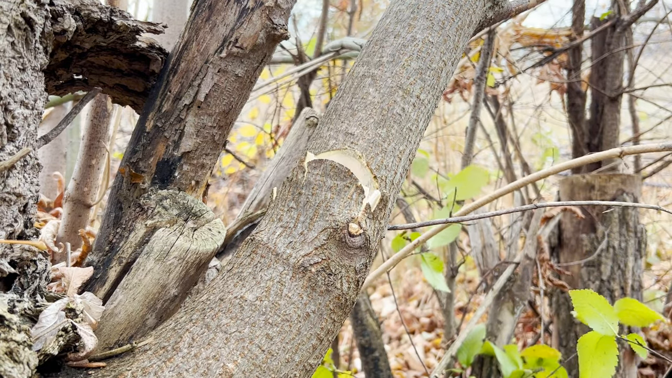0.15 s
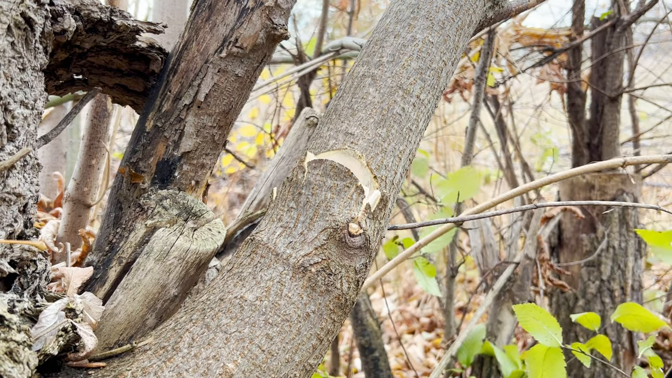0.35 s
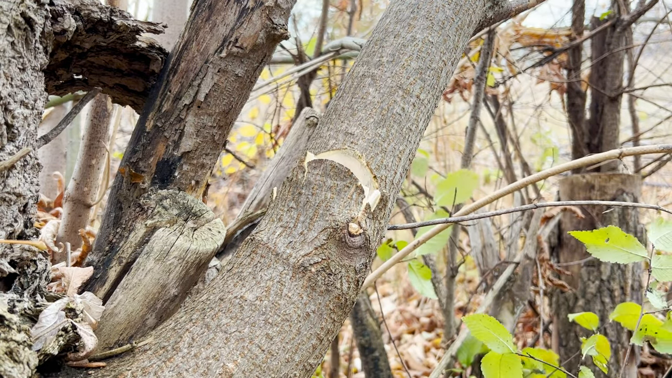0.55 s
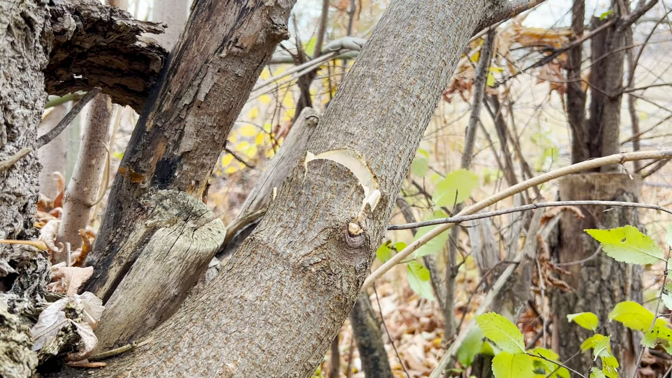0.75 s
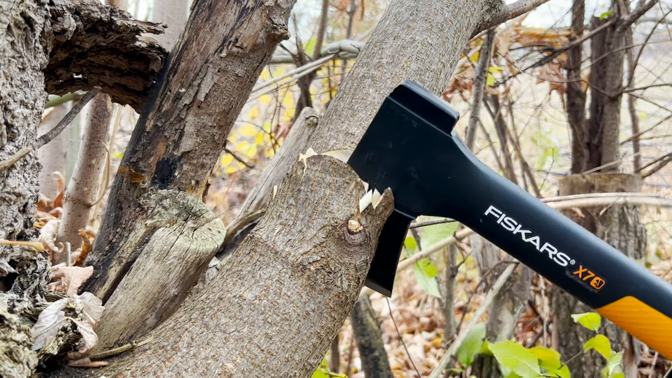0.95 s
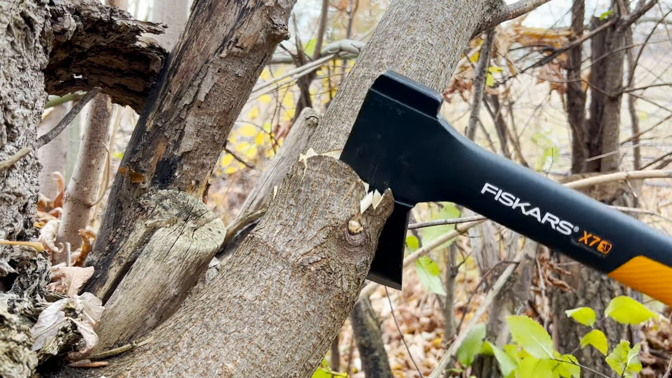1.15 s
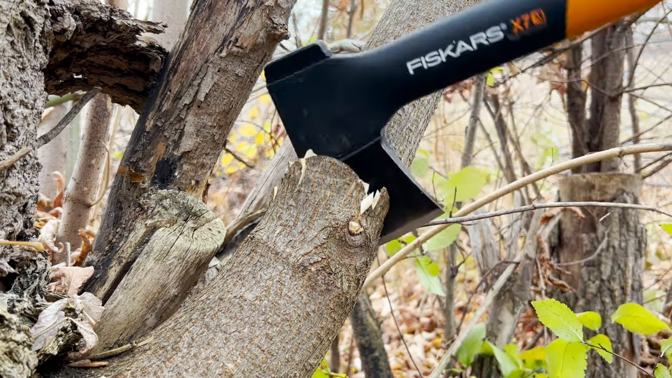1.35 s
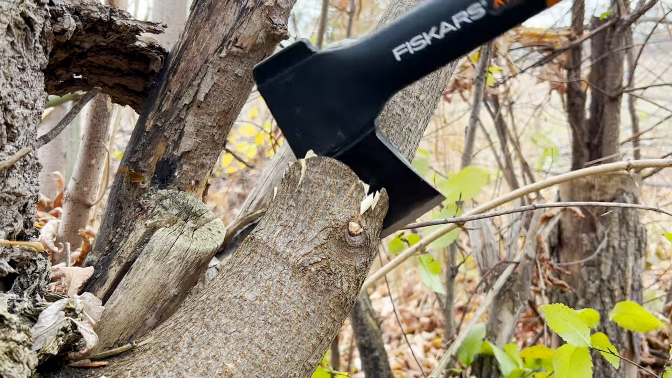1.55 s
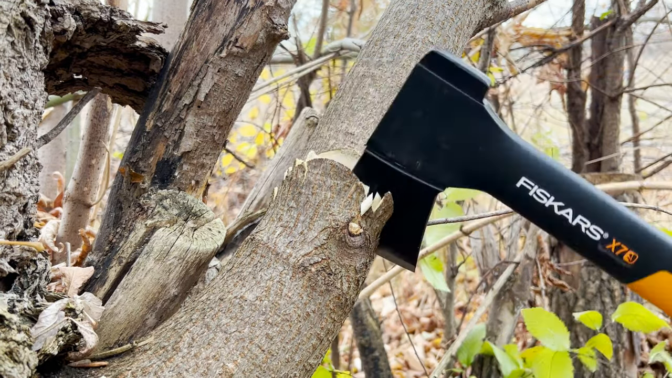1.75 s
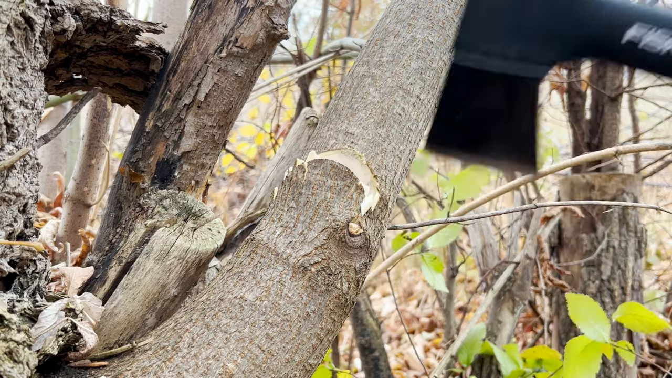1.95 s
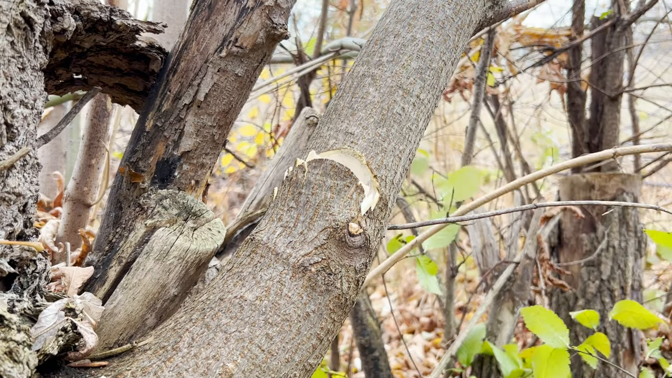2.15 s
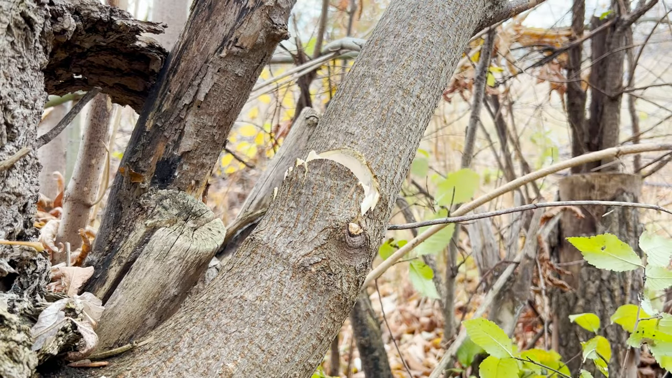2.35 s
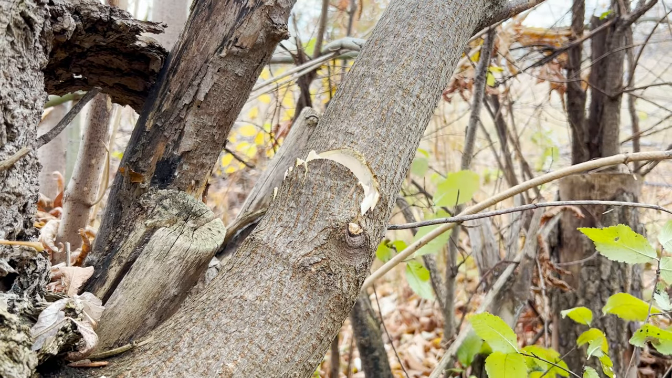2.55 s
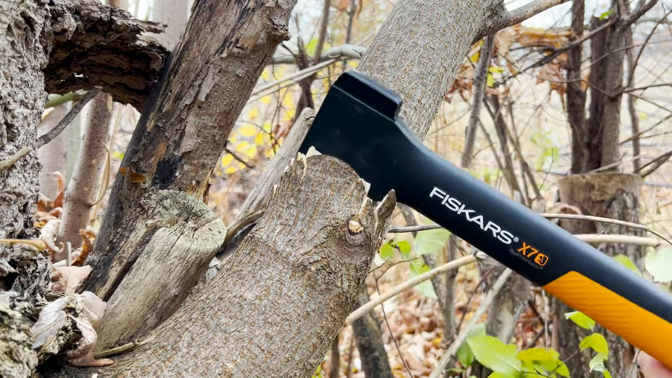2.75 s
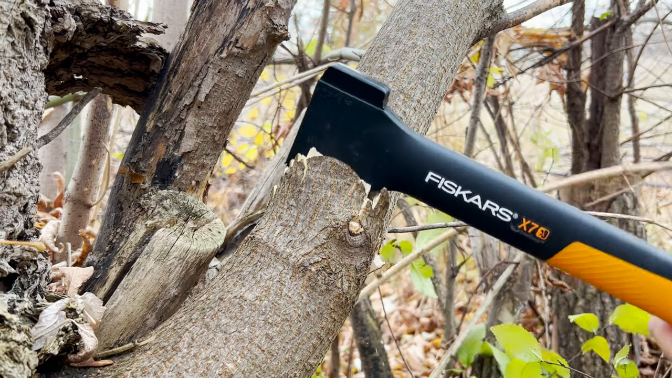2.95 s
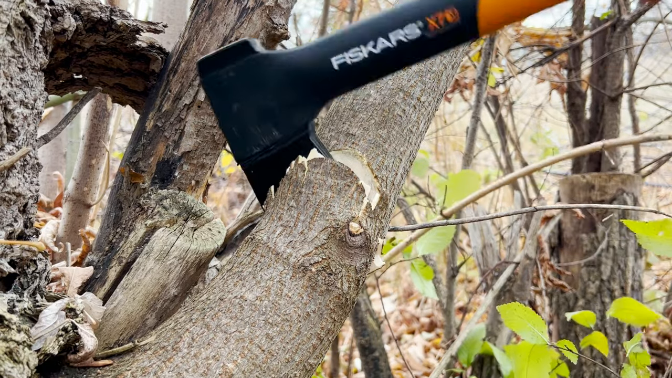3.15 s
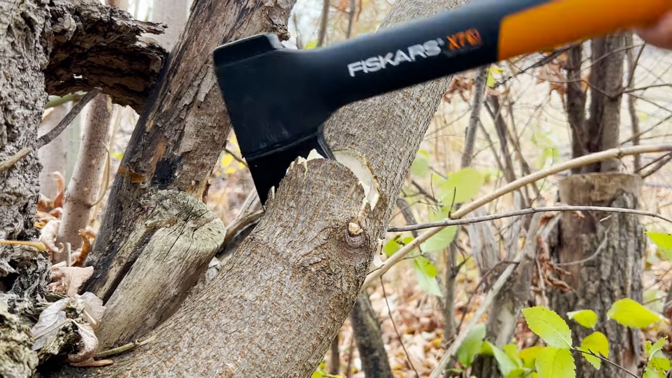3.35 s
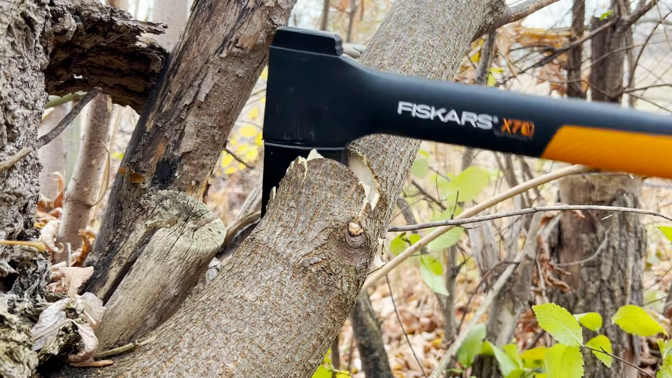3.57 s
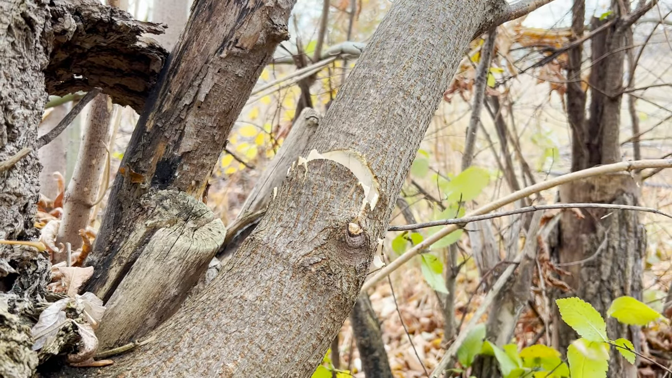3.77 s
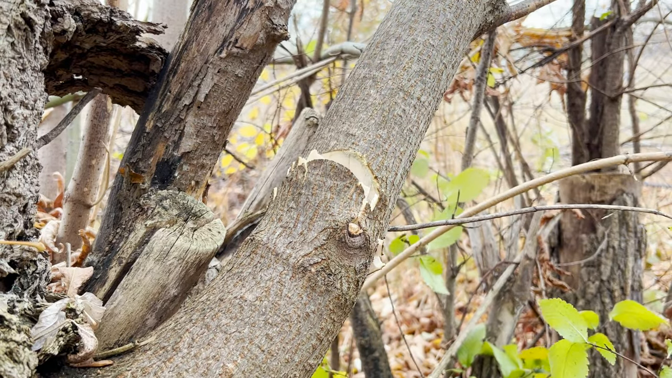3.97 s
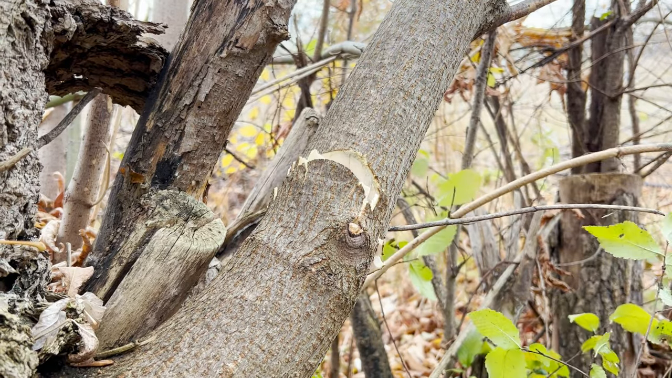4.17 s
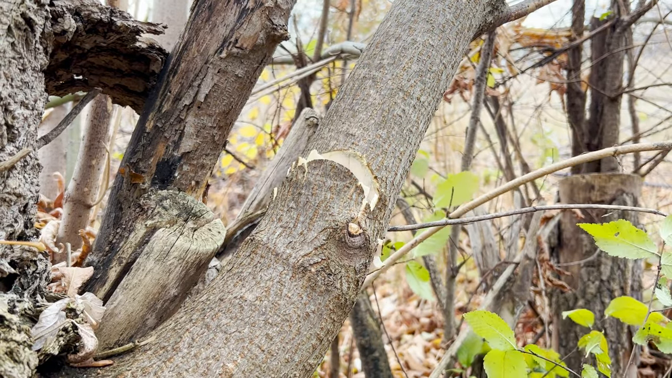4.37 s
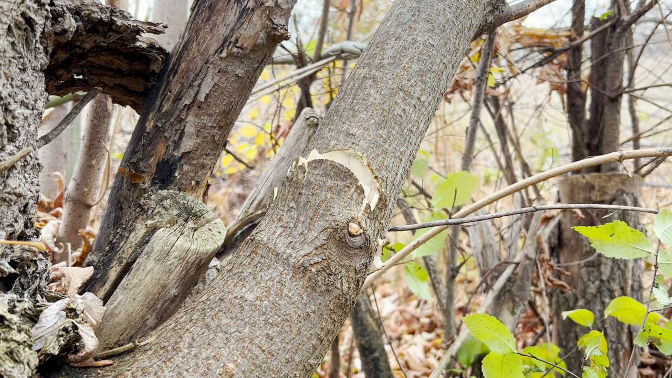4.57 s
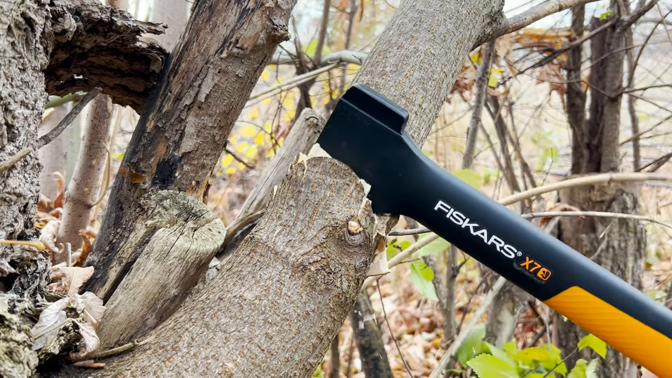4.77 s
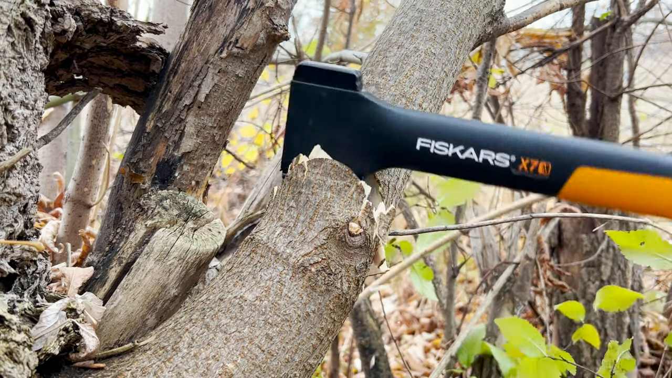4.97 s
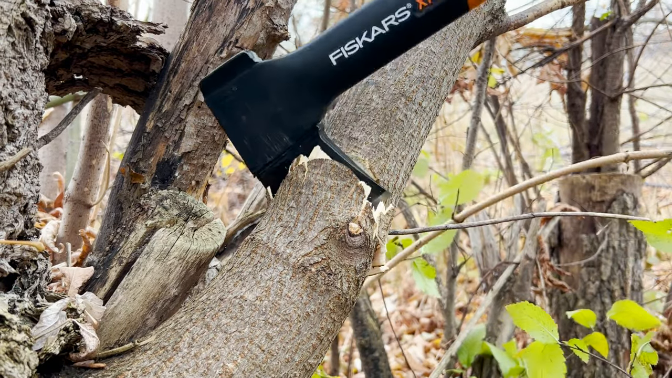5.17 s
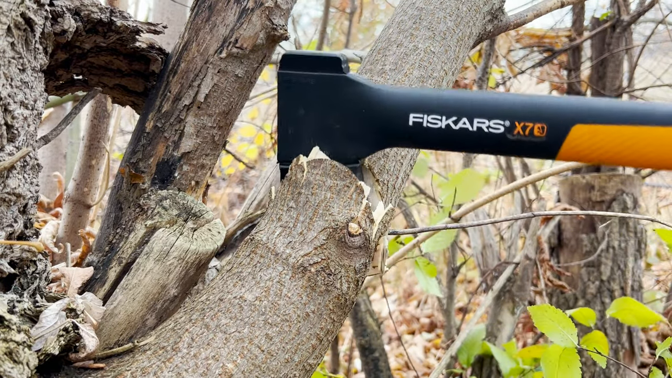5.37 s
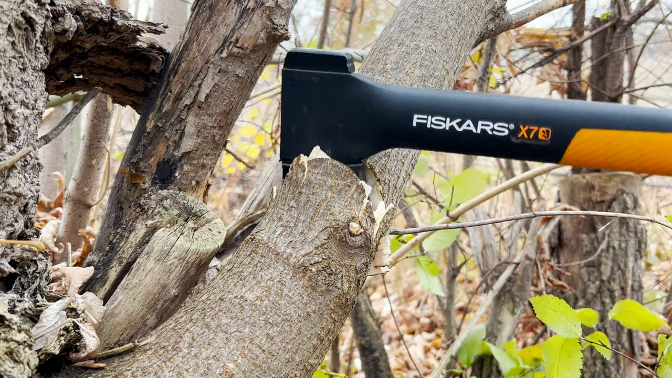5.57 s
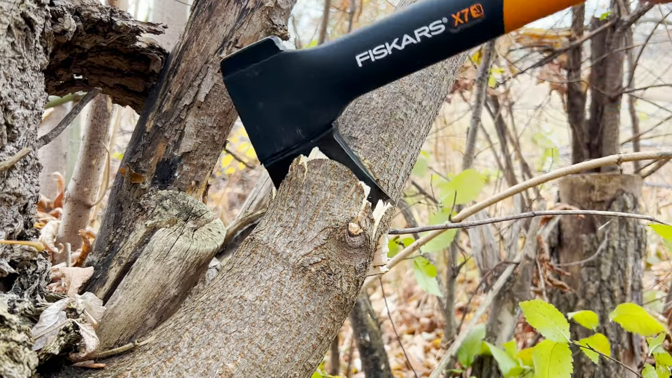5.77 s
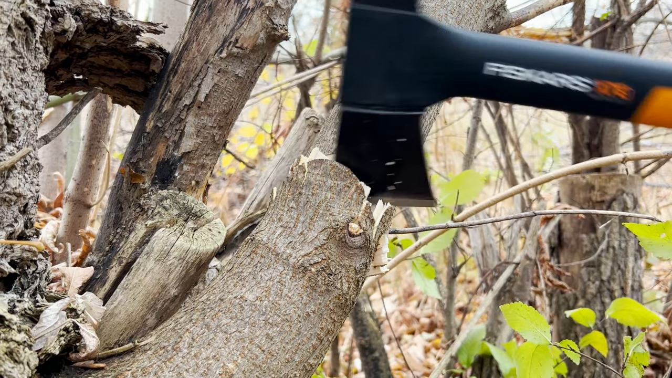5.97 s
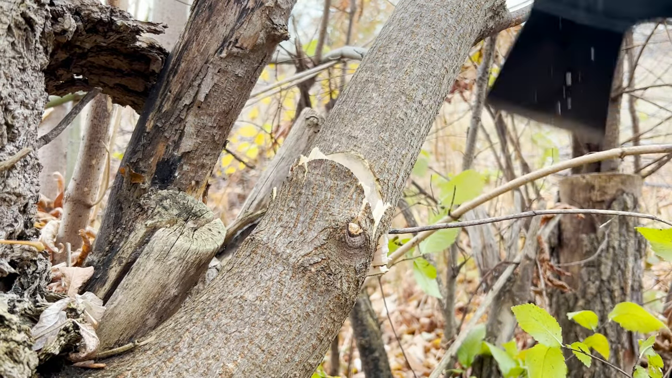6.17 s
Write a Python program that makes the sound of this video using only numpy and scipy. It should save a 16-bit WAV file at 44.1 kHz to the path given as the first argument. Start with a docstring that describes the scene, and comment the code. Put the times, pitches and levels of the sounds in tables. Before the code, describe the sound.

Close to the microphone, a hatchet bites into a small tree trunk three times, about two seconds apart. Each blow is a sharp crack with a brief metal ring and a hollow knock. The wood snaps as the blade is levered, and chips, twigs and dry leaves tick and rustle. Songbirds chirp, whistle and trill among echoing trees, while light gusts rumble on the microphone.

```python
"""Songbirds chip, whistle and trill among echoing trees while gusts buffet a two-port microphone.
Behind them are the hush of the wood, a far cricket and a slow, regular low thump.
Close by, a hatchet bites three times into a small trunk: the head rings, fibres split, the trunk booms.
The cut cracks as the blade is levered, and chips, twigs and dry leaves tick and rustle."""
import sys
import numpy as np
from scipy import signal
from scipy.fft import rfft, irfft, next_fast_len
from scipy.io import wavfile
from scipy.ndimage import uniform_filter1d, map_coordinates

SR = 44100
rng = np.random.default_rng(int(sys.argv[2]) if len(sys.argv) > 2 else 0)


def pcm_store(signal):
    """Save signal as 16-bit PCM."""
    levels = np.round(np.clip(np.atleast_2d(signal), -1, 1) * 32767)
    wavfile.write(sys.argv[1], SR, levels.astype(np.int16).T)


N = 274302

# Tone colours of noise: f/Hz, level/dB per Hz
AIR_RUMBLE = [(15, -35), (35, 14), (62, 13), (110, 6.5), (200, -30)]  # deep part of wind on the ports
AIR_FLAP = [(90, -10.5), (140, -2.5), (250, -13), (400, -27), (800, -38)]  # its sharper part
CRISP = [(300, -2.5), (2000, 6.5), (5000, 8), (8000, 14), (9300, 5.5), (10000, -10), (11000, 8.5),
         (13500, 12), (16000, -4)]  # bright part of leaf, twig and blade sounds
DULL = [(150, -0.5), (350, -1.5), (1500, -10), (3000, -14), (6000, -24.5)]  # their duller part
# Ringing tones of the hatchet head: f/Hz, level/dB, t60/s (the time to fade by 60 dB)
HEAD_TONES = [(1683, 4.5, 0.36), (2400, -9, .08), (2805, -7, 0.35), (4850, -10, 0.017)]


def amp(db):
    """Turns decibels into a gain."""
    return 10 ** (np.asarray(db) / 20)


def unit(x):
    """Scales a signal to an average (rms) level of 1."""
    return x / np.sqrt(np.mean(x ** 2) + 1e-20)


def along(points, hz):
    """Reads between (f/Hz, value) points on a log frequency axis."""
    freqs, values = np.transpose(points)
    return np.interp(np.log(hz + 1), np.log(freqs + 1), values)


def wobble(rate):
    """A smooth curve through `rate` random values a second."""
    return map_coordinates(rng.standard_normal(int(N * rate / SR) + 4), [np.arange(N) * rate / SR])


def filtered(x, response):
    """Changes the strength and phase of each frequency by response(hz)."""
    n = x.shape[-1]
    padded = next_fast_len(n + 8192)
    return irfft(rfft(x, padded) * response(np.fft.rfftfreq(padded, 1 / SR)), padded)[..., :n]


def noise(spectrum, size=N, alike=None):
    """Noise of a given tone colour; a left-right pair if `alike` is set (0 unrelated, 1 the same)."""
    def colour(hz):
        return amp(along(spectrum, hz)) * (hz < 1.5 * spectrum[-1][0])
    middle, side = (unit(filtered(rng.standard_normal(size), colour)) for _ in range(2))
    if alike is None:
        return middle
    turn = np.arccos(np.clip(alike, 0, 1)) / 2
    return np.cos(turn) * middle + np.sin(turn) * np.array([side, -side])


def patchy(x, depth_db):
    """Makes random patches of time and frequency louder or softer."""
    cells = signal.stft(x, nperseg=256)[2]
    patches = uniform_filter1d(rng.standard_normal(cells.shape[-2:]), size=4, axis=0)
    patches = uniform_filter1d(patches, size=6, axis=1)
    return unit(signal.istft(cells * amp(depth_db * unit(patches)), nperseg=256)[1][..., :N])


def add(track, s, sound):
    """Mixes a sound in at s seconds."""
    part = track[round(s * SR):][:len(sound)]
    part += sound[:len(part)]


def ring(tones, t, attack):
    """A struck thing rings with fading tones, each at a slightly random strength."""
    ringing = sum(amp(db + rng.normal(0, 2.2) - 60 * t / t60) * np.sin(2 * np.pi * hz * t)
                  for hz, db, t60 in tones)
    return ringing * (1 - np.exp(-t / attack))


def near(x, low_pan_db):
    """A close sound reaches both ports: bass favours the left, treble shifts in phase between them."""
    # How far the left port's wave is ahead: f/Hz, phase/rad
    left_lead = [(100, 0.1), (700, 1.26), (2000, 0.73), (7800, 1), (10000, -19.5), (13000, -4.5),
                 (16500, -9.5)]
    side = np.array([[.5], [-.5]])
    def ports(hz):
        balance = amp(side * low_pan_db / (1 + (hz / 800) ** 2))
        return balance * np.exp(1j * side * along(left_lead, hz))
    return filtered(np.array([x, x]), ports)


def trees(x):
    """Trunks scatter sound: the nearest answer quickly, then each frequency fades at its own speed."""
    # How long the wood echoes: f/Hz, t60/s
    echo_times = [(200, 1), (2000, 0.79), (5000, 0.58), (12000, 0.36)]
    hz, t, cells = signal.stft(rng.standard_normal((3, 2, SR)), SR, nperseg=256)
    fade = amp(-60 * t / along(echo_times, hz)[:, None]) + 2.8 * amp(-60 * t / 0.02)
    tails = signal.istft(cells * fade, SR, nperseg=256)[1]
    tails[:, 1] = 0.6 * tails[:, 0] + 0.56 * tails[:, 1]  # right partly follows left
    tails /= np.linalg.norm(tails[0, 0])
    # Three echo paths take turns, as sounds come from different places.
    turns = np.cos(np.pi * (np.arange(N) / SR / .45 + np.arange(3)[:, None] / 3)) * np.sqrt(2 / 3)
    delayed = np.pad(x * turns, ((0, 0), (150, 0)))[:, None]
    return signal.fftconvolve(delayed, tails, axes=2).sum(axis=0)[:, :N]


def hush():
    """The steady, far-off noise of the wood."""
    # Its tone colour: f/Hz, level/dB per Hz
    colour = [(15, -30.5), (25, -1.5), (65, 0), (207, -6), (329, -6.5), (631, -12), (723, -13.5),
              (948, -14), (1030, -14), (3990, -17.5), (4830, -19.5), (15100, -27), (16400, -31)]
    return amp(-53.5) * noise(colour, alike=0.073)


def thumps():
    """A slow, regular beat of very low pulses."""
    # One per beat: level/dB
    levels = [-31, -27, -27, -35, -27.5, -31, -26.5, -37.5, -34, -23, -31]
    first_s, every_s, fade_s = .14, .557, .061
    out, t = np.zeros(N), np.arange(SR // 5) / SR
    pulse = np.sin(2 * np.pi * 9 * t) * np.exp(-(t / fade_s) ** 2)
    for beat, db in enumerate(levels):
        add(out, first_s + beat * every_s, amp(db) * pulse)
    return out


def gusts():
    """Wind buffets the ports and sounds sharper as it grows."""
    # Strength of the wind: t/s, level/dB
    strength = [(0, -27.5), (.1, -61.5), (.45, -49), (.75, -41.5), (.95, -37.5), (1.16, -47), (1.33, -47),
                (1.5, -57), (1.8, -43.5), (2.16, -36.5), (2.35, -35.5), (2.43, -48.5), (2.9, -44.5),
                (4.3, -59), (4.6, -50), (4.77, -35.5), (4.96, -53), (6.22, -61)]
    db = np.interp(np.arange(N) / SR, *np.transpose(strength))
    lumps = amp(4.6 * wobble(25))
    rumble = amp(db) * noise(AIR_RUMBLE, alike=0.71)
    return rumble + amp(1.237 * db - 3.5) * unit(lumps * noise(AIR_FLAP, alike=0.543))


def slaps():
    """Single puffs of air hit the ports: a low swing with a sharper flick."""
    # Puffs: t/s, level/dB, flick against swing/dB
    puffs = [(0.614, -32.5, -2.5), (0.709, -37, -20), (1.102, -34, -31.5), (1.801, -32.5, -16),
             (1.834, -27.5, -14), (1.888, -25.5, -25), (2.005, -30, -7.5), (2.038, -37.5, 3),
             (2.186, -24, -14.5), (2.269, -34.5, -1), (2.682, -25, -16), (3.679, -47, 5.5),
             (3.982, -40.5, -25)]
    out, t = np.zeros(N), np.arange(SR // 5) / SR
    for s, db, flick_db in puffs:
        swing = np.sin(2 * np.pi * rng.uniform(46.2, 80.5) * t) + 0.69 * noise(AIR_RUMBLE, len(t))
        flick = amp(flick_db) * np.exp(-t / 0.077) * noise(AIR_FLAP, len(t))
        add(out, s, amp(db) * t / 0.0044 * np.exp(-t / 0.012) * (swing + flick))
    return out


def cricket():
    """A thin, high sound swells about three times a second, each swell a run of wing strokes."""
    t = np.arange(N) / SR
    chirp = np.clip(np.cos(2 * np.pi * 2.984 * (t - 3.27) + .5 * wobble(2.94)) + 1.78, 0, 2)
    strokes = 1 + 0.15 * np.sin(2 * np.pi * 53 * t)
    wings = [(4300, -50), (4600, -8), (4750, 0), (4900, -8), (5200, -50)]  # f/Hz, level/dB per Hz
    return amp(-69.5) * chirp * strokes * noise(wings, alike=0.5)


def far_bird():
    """Thin, pure notes that scoop up to their pitch, flicker and fade."""
    # Notes: t/s, length/s, start f/Hz, held f/Hz, level/dB, change over the note/dB
    notes = [(2.15, .27, 3940, 4035, -49, -21), (2.82, .125, 3950, 4040, -58, -1)]
    scoop_s, edge_s = .02, .012
    out = np.zeros(N)
    for s, length, from_hz, hz, db, fade_db in notes:
        t = np.arange(0, length, 1 / SR)
        pitch = hz + (from_hz - hz) * np.exp(-t / scoop_s)
        edges = np.clip(np.minimum(t, length - t) / edge_s, 0, 1)
        add(out, s, amp(db + fade_db * t / length) * edges * np.sin(2 * np.pi * np.cumsum(pitch) / SR))
    return out * amp(2.5 * wobble(60))


def songbirds():
    """Wavering pure notes glide onto a pitch and off it; returns the direct part and the part to echo."""
    # Notes: t/s, length/s, start f/Hz, held f/Hz, end f/Hz, relative level/dB, glide-in/s
    chips = [(.054, 0.011, 5070, 4820, 4660, -38, 0.0047), (.165, 0.034, 4720, 3534, 3100, -34.5, 0.0031),
             (.27, 0.034, 4880, 3550, 2350, -40, .003), (.492, 0.041, 4710, 3480, 2790, -39, 0.00355),
             (.822, 0.074, 9410, 3480, 2770, -38.5, 0.011), (1.056, 0.05, 6400, 3694, 2470, -38, 0.0055),
             (5.03, 0.026, 4410, 3606, 3850, -46, 0.0043), (5.086, 0.033, 3820, 3386, 3450, -41.5, 0.004),
             (5.138, 0.028, 3780, 3310, 3340, -49, 0.0035), (5.198, 0.032, 3620, 3260, 3200, -48.5, 0.0053),
             (5.262, 0.018, 4200, 3180, 2580, -46, 0.0055), (5.335, 0.015, 4080, 3110, 2480, -45.5, 0.0055),
             (5.405, 0.012, 4380, 3166, 2620, -47.5, 0.0063), (5.476, 0.019, 3800, 3030, 2560, -49, 0.0083)]  # the nearer bird drops onto a pitch
    arches = [(.03, 0.036, 3490, 3850, 4400, -44, 0.0074), (.113, 0.051, 4460, 4766, 4900, -36, 0.014),
              (.258, 0.011, 4060, 5010, 4600, -39.5, 0.0061),
              (.487, 0.0081, 4190, 4520, 4400, -38.5, 0.003), (.99, 0.049, 3520, 4614, 4320, -41.5, 0.0058),
              (1.225, 0.06, 3270, 4690, 3030, -44.5, 0.012), (1.328, 0.059, 3807, 4630, 3170, -41, 0.011),
              (1.33, 0.046, 3486, 3923, 3500, -45.5, 0.009), (1.228, 0.0456, 3180, 3940, 3600, -47, 0.0127),
              (1.43, 0.069, 4040, 4770, 4200, -40, 0.0074), (1.425, 0.05, 3490, 3870, 3560, -46, 0.01212),
              (1.54, 0.048, 4560, 4640, 3870, -44, 0.0063), (1.645, 0.024, 4490, 4560, 4740, -45, 0.0072)]  # it climbs onto a pitch
    whistles = [(0, 0.15, 1887, 2184, 2178, -57, 0.042), (.26, 0.15, 2350, 1763, 1817, -54, 0.029),
                (.326, 0.099, 2724, 3237, 3156, -39.5, 0.013), (.6, 0.11, 2210, 2230, 2130, -61.5, 0.016),
                (.895, 0.27, 2046, 1990, 2624, -57, 0.023), (5.197, .235, 1580, 2331, 2014, -55.5, 0.009),
                (5.47, 0.096, 2240, 2200, 2136, -59.5, 0.031), (5.55, 0.084, 2190, 2620, 2540, -53, .035)]  # long notes of farther birds
    # Runs of falling sweeps: the same columns, then sweep rate/Hz, sweep size/Hz
    trills = [(1.625, 0.13, 3676, 3510, 3470, -43, 0.051, 52.25, 1080),
              (3.42, 0.17, 3680, 3520, 3400, -44.5, 0.059, 53.5, 1052),
              (5.3, 0.149, 3675, 3546, 3380, -47.5, 0.0498, 60.5, 1496)]
    buzzes = [(0, 0.034, 3306, 3530, 3690, -35, 0.021, 131, 810),
              (1.925, 0.11, 5300, 4670, 4470, -50.5, 0.011, 129.3, 700),
              (4.84, 0.2, 5400, 5440, 5400, -55.5, 0.055, 128.6, 504),
              (4.97, 0.095, 5960, 5573, 5508, -54.5, 0.024, 128, 914),
              (5.555, 0.2, 3987, 2526, 2564, -39.5, .08, 129.2, 620),
              (5.74, 0.12, 2700, 2490, 2460, -53.5, 0.035, 129, 297)]  # too quick or too far to count
    # notes, glide-out, swell, die-away (shares of a note), change/dB, flutter/dB, direct/dB, echo/dB
    kinds = [(chips, 0.11, 0.16, 0.1, 0.1, 1.5, -1.5, -1),
             (arches, 0.11, 0.3, 0.04, 1.5, 1.8, -1.5, -2.5),
             (whistles, 0.6, 0.12, 0.3, -1.5, 3, -4, -3),
             (trills, 0.54, 0.18, 0.15, 1.5, 1.6, -1, -2),
             (buzzes, 1.65, 0.12, 0.8, -9, 2, -2, 2.5)]
    direct, scattered = np.zeros((2, N))
    waver, flutter = wobble(120), wobble(90)
    for notes, glide_out, swell, die, change_db, flutter_db, direct_db, echo_db in kinds:
        for s, length, from_hz, hz, end_hz, db, glide_in_s, *trill in notes:
            rate, sweep_hz = trill or (0, 0)
            t = np.arange(0, length, 1 / SR)
            progress = t / length
            span = slice(round(s * SR), round(s * SR) + len(t))
            sweep = (rate * t + 0.068 * flutter[span]) % 1
            gate = np.sin(np.pi * np.clip(sweep / 0.74, 0, 1)) if rate else 1  # gaps between sweeps
            edges = np.clip(np.minimum(progress / swell, (1 - progress) / die), 0, 1)
            glide = (from_hz - hz) * np.exp(-t / glide_in_s)
            glide += (end_hz - hz) * np.exp((progress - 1) / glide_out)
            pitch = hz * (1 + 0.003 * flutter_db * waver[span]) + glide + sweep_hz * (.4 - sweep)
            loudness = amp(db + 6.0 + change_db * progress + flutter_db * flutter[span])
            voice = loudness * gate * edges * np.sin(2 * np.pi * np.cumsum(pitch) / SR)
            # Fainter birds are farther away, so less of their song arrives straight.
            add(direct, s, amp(direct_db + 0.096 * (db + 34.0)) * voice)
            add(scattered, s, amp(echo_db) * voice)
    return direct, scattered


def leaves():
    """Dry leaves, shaken by the blows and the arm, swell and fade over a faint steady rustle."""
    # Shakes: peak t/s, level/dB, dull against crisp/dB, rise/s, fall t60/s
    shakes = [(.9, -59.5, 10.5, 0.15, 3), (1.62, -60, 2.5, 0.055, 1.43), (2.405, -53, -3, 0.02, 0.3),
              (2.49, -49, -13, 0.019, 0.34), (2.523, -41, -9, .003, 0.24), (3, -56.5, 7.5, 0.097, 2.2),
              (3.45, -64.5, 6.5, 0.08, 4.5), (4.7, -51.5, 5, 0.052, 0.693), (4.88, -56.5, 4, 0.13, 0.7)]
    t = np.arange(N) / SR
    crisp_power, dull_power = amp(-75) ** 2, amp(-90) ** 2  # leaves at rest
    for s, db, dull_db, rise, t60 in shakes:
        shape = np.where(t < s, np.exp(-((t - s) / rise) ** 2), amp(-120 * np.abs(t - s) / t60))
        crisp_power += amp(db) ** 2 * shape
        dull_power += amp(db + dull_db) ** 2 * shape
    grain = amp(4.5 * wobble(400) + 2.5 * wobble(50))
    crisp = unit(grain * near(noise(CRISP), low_pan_db=3) + 1.2 * noise(CRISP, alike=0.089))
    dull = patchy(noise(DULL, alike=0.55), depth_db=4.0)
    return np.sqrt(crisp_power) * crisp + np.sqrt(dull_power) * dull


def twigs():
    """Chips and twigs tick, each with a snap, a knock and a woody ring."""
    # Ticks: t/s, snap level/dB, relative level of knock and ring/dB
    ticks = [(0.115, -47.5, -4.5), (0.571, -43, -13), (0.612, -47, -18), (0.887, -36, -31),
             (1.465, -41.5, -19.5), (1.619, -44, -11), (2.486, -36, -37), (2.5, -51.5, -2),
             (2.5177, -28.5, -33), (2.522, -29.5, -38), (2.542, -35.5, -17.5), (2.999, -40, -23),
             (3.129, -40.5, -13), (3.195, -55, -1), (3.322, -57.5, 1), (3.562, -52, -5),
             (3.695, -45.5, -7.5), (4.013, -46, -19), (4.755, -44, -25), (4.7735, -42, -34.5),
             (5.955, -39, -38)]
    # A twig's ring: f/Hz, level/dB, t60/s
    twig_tones = [(1090, -24, 0.017), (2040, 2, 0.011)]
    out, t = np.zeros(N), np.arange(SR // 20) / SR
    faint_ticks = [(when * N / SR, -60 + 9 * loud, -20 + 12 * woody)
                   for when, loud, woody in rng.random((40, 3))]
    for s, db, body_db in ticks + faint_ticks:
        snap = amp(-60 * t / 0.009) * noise(CRISP, len(t))
        knock = amp(body_db + 7.5 - 60 * t / 0.069) * noise(DULL, len(t))
        tone = amp(body_db + 8.0) * ring(twig_tones, t, attack=0.00048)
        add(out, s, amp(db) * (snap + knock + tone))
    return near(out, low_pan_db=9.5)


def levering():
    """Wood cracks as the blade sinks in or is levered: a sharp snap, a short ring and a dull thud."""
    # Cracks: t/s, snap/dB, ring/dB, thud/dB
    cracks = [(0.8491, -21, -26, -11.5), (1.255, -20, -25.5, -28), (1.3247, -26, -35, -38),
              (1.3981, -32, -34, -39), (4.878, -21.5, -29.5, -27.5), (5.945, -27.5, -34, -48)]
    # Ring of the cut's lips: f/Hz, level/dB, t60/s
    cut_tones = [(1105, -6, 0.013), (2110, 7, 0.0071), (3370, -3, 0.0085)]
    snap_t60, thud_t60 = 0.003, 0.032
    out, t = np.zeros(N), np.arange(SR // 20) / SR
    for s, snap_db, ring_db, thud_db in cracks:
        snap = amp(snap_db - 60 * t / snap_t60) * noise(CRISP, len(t))
        thud = amp(thud_db - 60 * t / thud_t60) * (1 - np.exp(-t / 0.0016)) * noise(DULL, len(t))
        add(out, s, snap + thud + amp(ring_db) * ring(cut_tones, t, attack=0.00023))
    return near(out, low_pan_db=5.5)


def hum_before_blow():
    """A faint ringing hum and hiss just before a blow."""
    # Hums: t/s, length/s, hum/dB, hiss/dB
    hums = [(2.703, .025, -41, -56), (4.649, 0.014, -36, -30)]
    out = np.zeros(N)
    for s, length, hum_db, hiss_db in hums:
        t = np.arange(0, length, 1 / SR)
        hum = amp(hum_db) * ring(HEAD_TONES, t, attack=0.0016)
        hiss = amp(hiss_db - 9 * t / length) * noise(CRISP, len(t))
        add(out, s, hum + hiss)
    return out


def hatchet():
    """The head rings until the wood grips it, fibres crack, the trunk answers late, splinters tear."""
    # Blows: t/s, crack/dB, crack hold/s, crack t60/s, snap/dB, lead-in/s, head/dB, trunk/dB,
    # trunk delay/s, splinters/dB
    blows = [(0.8422, -2.5, 0.0012, 0.0099, -11.5, 0.006, -21.5, -8.5, 0.004, -30.5),
             (2.7300, -8.5, 0.00095, 0.0085, -9, 0.0033, -12, -16.5, 0.012, -37.5),
             (4.662, -8.5, 0.0049, 0.02, -16, 0.0055, -18.5, -7, 0.0031, -31)]
    # The trunk's ring: f/Hz, level/dB, t60/s
    trunk_tones = [(65.5, -12, 0.2), (119.2, -6, 0.17), (205.2, 0, 0.079), (267.3, 0, 0.073),
                   (357, -5, 0.085), (431, -9, 0.072), (570, -5, 0.053), (898, -16.5, 0.066),
                   (1132, -20, 0.031)]
    # Splitting fibres: f/Hz, level/dB per Hz
    fibre_colour = [(250, -49), (450, -3.5), (1800, -5.5), (4200, -15), (5500, -25), (8100, -19.5),
                    (10000, -35), (13200, -30), (15000, -43), (16500, -49)]
    bend_hz = 308  # bending waves of this pitch take the trunk delay; lower ones come later
    out, t = np.zeros(N), np.arange(SR // 2) / SR
    for s, crack_db, hold, t60, snap_db, lead, head_db, trunk_db, delay, splinter_db in blows:
        grip = amp(-60 * np.clip(t - lead, 0, None) / (0.35 * t60))
        add(out, s - lead, amp(head_db) * grip * ring(HEAD_TONES, t, attack=lead))
        crack = amp(crack_db) * noise(fibre_colour, len(t))
        snap = amp(snap_db - 40 * t / t60) * noise(CRISP, len(t))
        burst = amp(-60 * np.clip(t - hold, 0, None) / t60) * (1 - np.exp(-t / 0.00085))
        add(out, s, burst * (crack + snap))
        for tone in trunk_tones:
            arrival = s + delay * np.sqrt(bend_hz / tone[0])
            add(out, arrival, amp(trunk_db) * ring([tone], t, attack=0.0049))
        add(out, s, amp(splinter_db - 60 * t / .25) * noise(DULL, len(t)))
    return out


def scene():
    """Mixes the chopping, the birds, their echoes and the background into left and right."""
    chops = hatchet() + hum_before_blow()
    song, scattered_song = songbirds()
    far_song = far_bird()
    echoes = amp(-27) * trees(chops) + amp(1.5) * trees(scattered_song + amp(-3.5) * far_song)
    close = near(chops, low_pan_db=5.0) + twigs() + leaves() + levering()
    background = cricket() + gusts() + slaps() + thumps() + hush()
    return background + echoes + far_song + song + close


def record(dry):
    """Softly flattens the peaks and cuts off the highest treble."""
    ceiling, top_hz = .88, 16500
    soft = dry / (1 + np.abs(dry / ceiling) ** 4) ** (1 / 4)
    return filtered(soft, lambda hz: hz < top_hz)


dry = scene()
out = record(dry)
pcm_store(out)
```